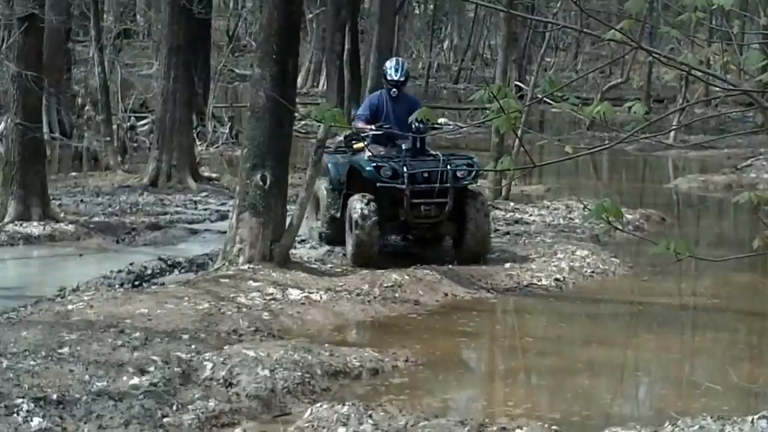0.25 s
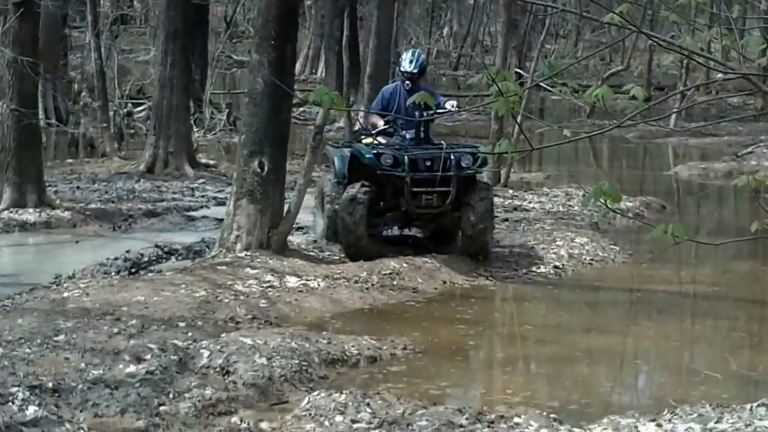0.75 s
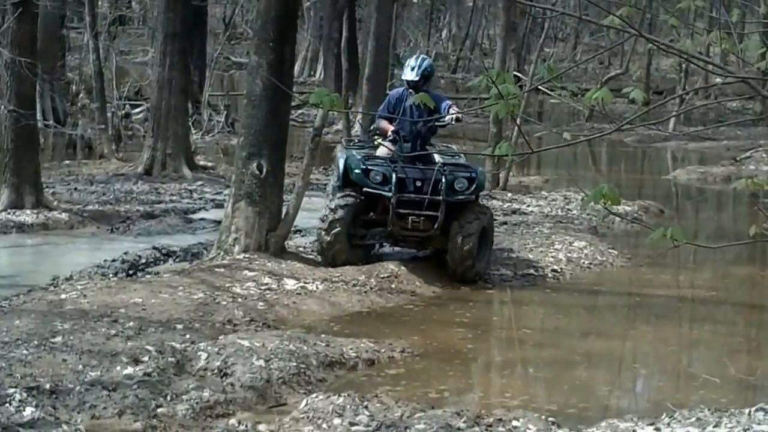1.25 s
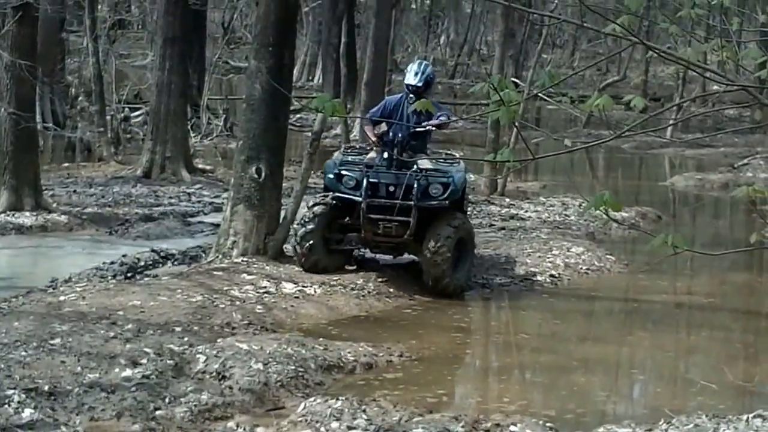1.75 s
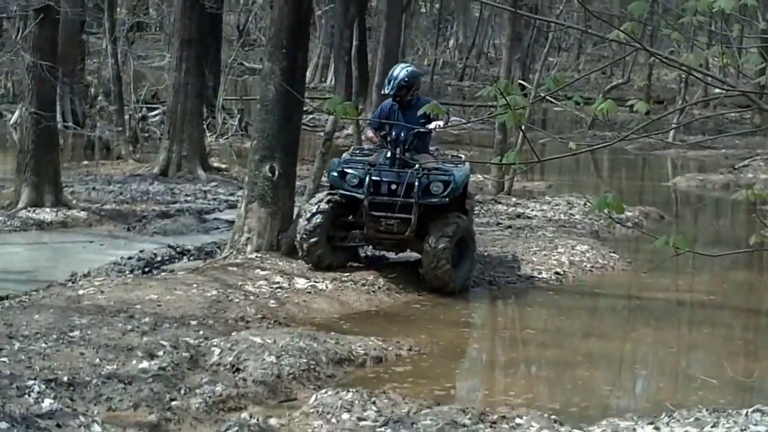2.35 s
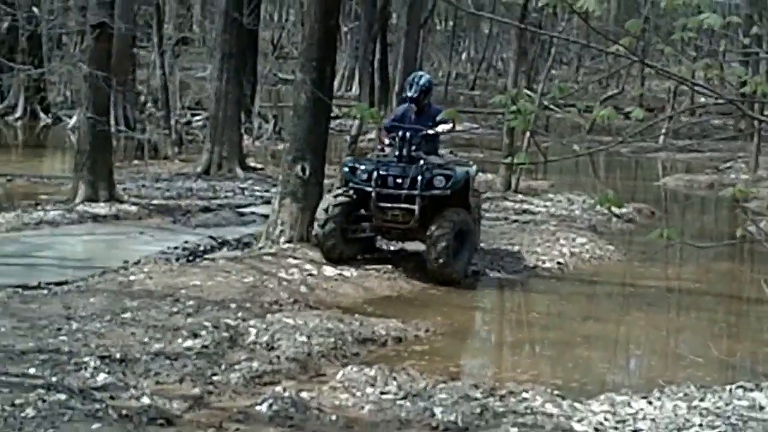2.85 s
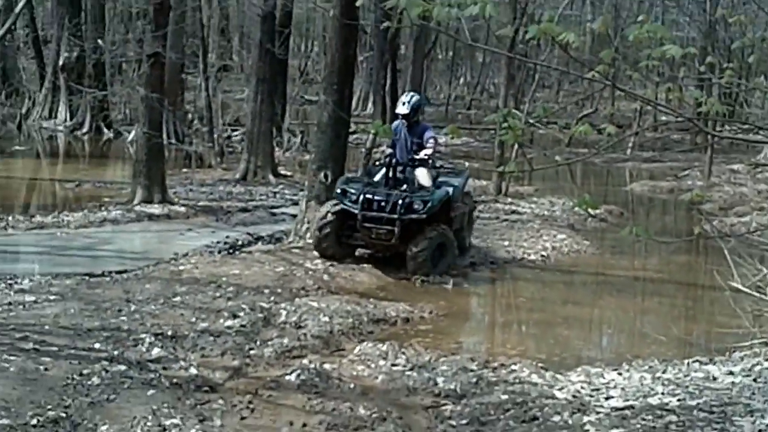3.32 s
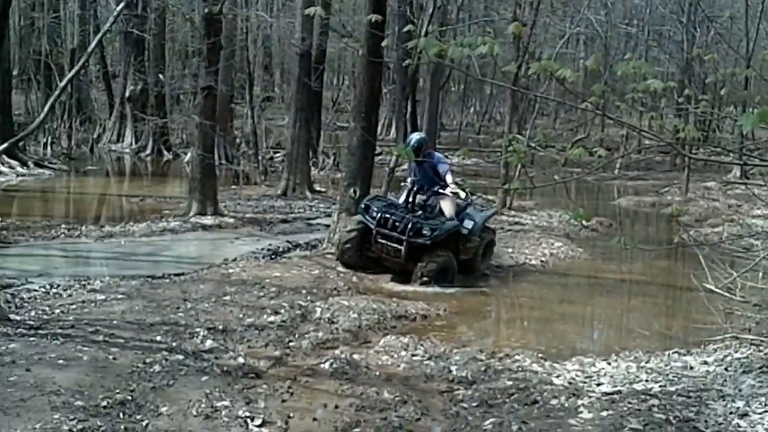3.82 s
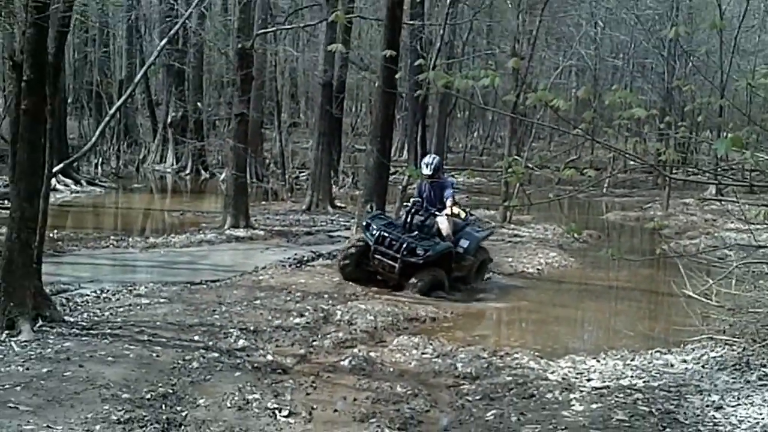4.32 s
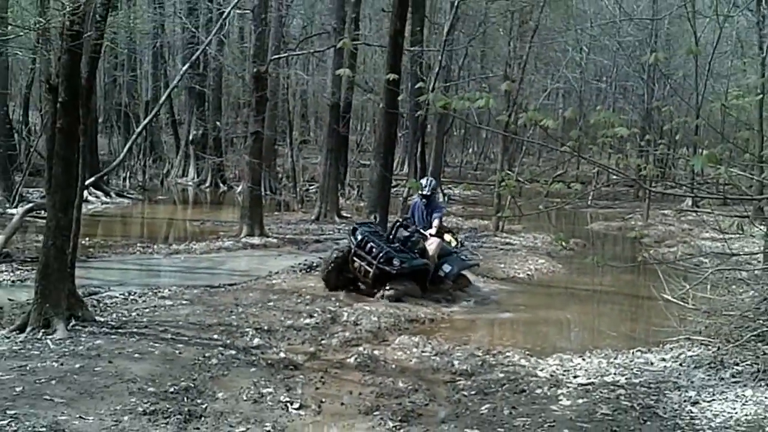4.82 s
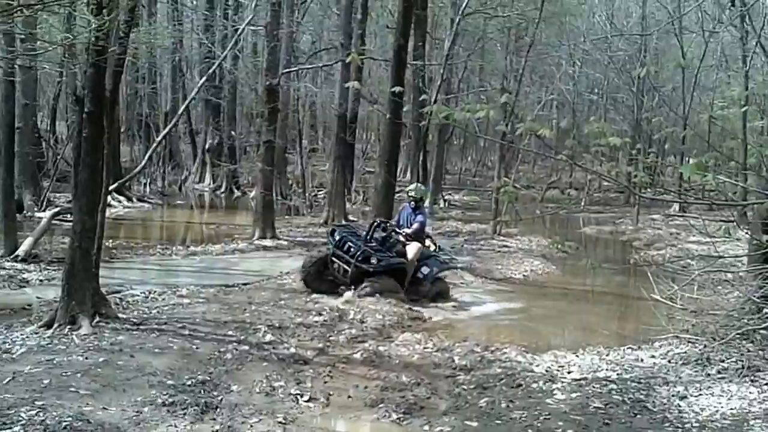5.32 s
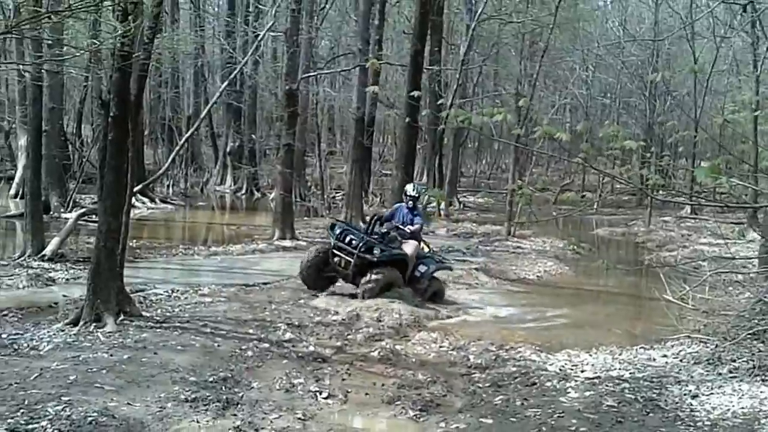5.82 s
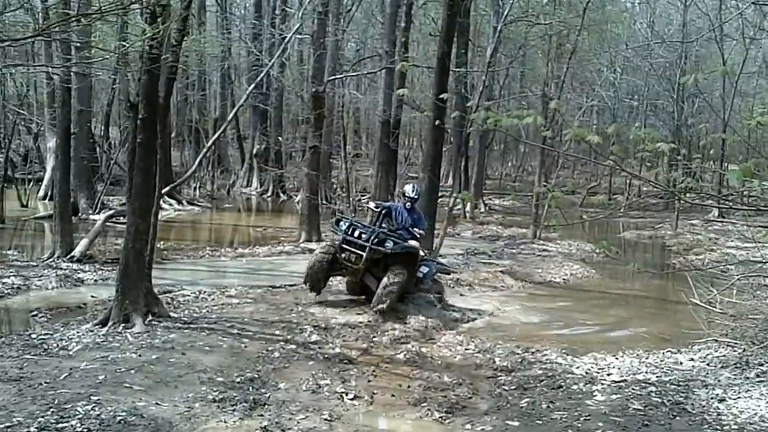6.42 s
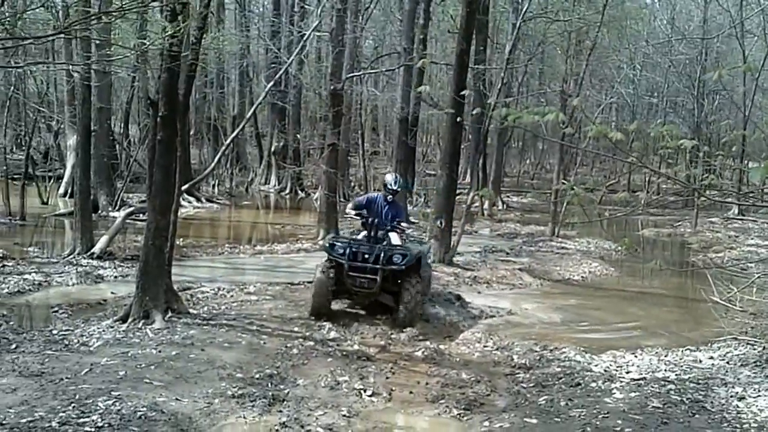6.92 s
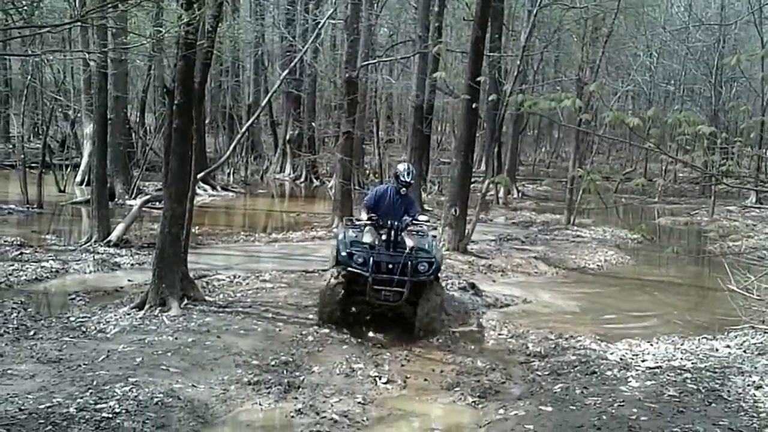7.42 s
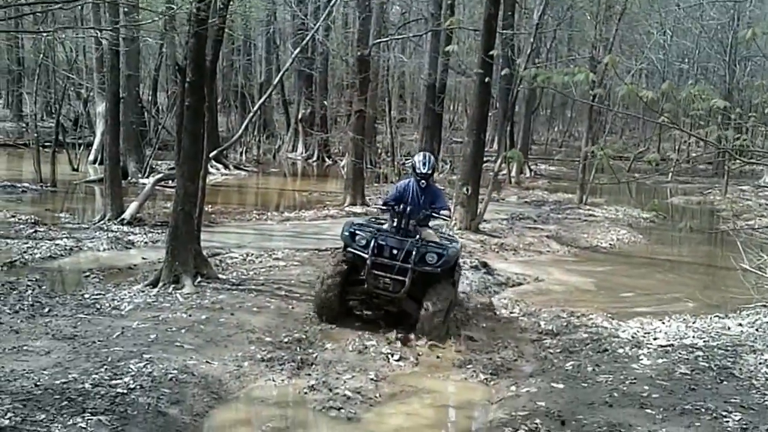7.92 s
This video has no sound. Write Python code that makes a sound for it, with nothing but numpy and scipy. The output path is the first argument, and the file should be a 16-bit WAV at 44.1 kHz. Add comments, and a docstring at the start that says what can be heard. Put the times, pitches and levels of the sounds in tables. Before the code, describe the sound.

Low, throbbing four-stroke ATV engine bogs down and revs again in mud, with metallic ticking, wet spits and clods knocking on panels.

```python
"""A single-cylinder four-stroke quad bike labours through mud and a pool in a swampy wood.
It slows raggedly after 1 s, surges at 2 s, sags again near 3.5 s, then pulls hard amid growing clatter.
Each stroke clicks damped resonances of pipes and frame over a harmonic drone and shaped gas noise.
Random grains make clatter and mud fizz, noise bursts make spits and clods, and sparse echoes make
the wood; the whole sound has four notches, a treble step and a band limit."""
import sys
import numpy as np
from scipy import signal
from scipy.fft import rfft, irfft
from scipy.io import wavfile
from scipy.ndimage import uniform_filter1d, map_coordinates

SR = 44100
rng = np.random.default_rng(int(sys.argv[2]) if len(sys.argv) > 2 else 0)


def bounce(signal):
    """Save signal as a 16-bit WAV file at the path given by the first command-line argument."""
    frames = np.transpose(np.atleast_2d(signal))
    limited = np.clip(frames, -1, 1)
    pcm = np.round(limited * 32767).astype(np.int16)
    wavfile.write(sys.argv[1], SR, pcm)


N = 359856

# Firing rate. Each row: time in seconds, firings per second.
FIRING_RATE = [(0.0, 20.23), (0.12, 21.93), (1.24, 17.08), (1.44, 13.91), (1.82, 15.18), (2.16, 24.52),
               (2.36, 22.98), (2.62, 24.27), (2.86, 23.62), (3.04, 19.23), (3.26, 17.47), (3.54, 12.9),
               (3.76, 21.07), (3.96, 22.06), (4.36, 21.04), (4.88, 22.15), (5.3, 20.72), (5.74, 24.63),
               (5.98, 23.35), (6.28, 23.31), (6.58, 22.46), (7.04, 24.22), (7.22, 21.59), (8.16, 25.51)]
# Ragged burning off the throttle. Each row: time in seconds, share of gas noise in the power from 0 to 1.
RAGGEDNESS = [(0, .2), (.55, .25), (1, .45), (1.9, .5), (2.2, .13), (2.9, .12), (3.1, .5), (3.5, .45),
              (3.8, .14), (7, .15), (8.16, .2)]
# Engine balance. Each row: time in seconds, exhaust thump in dB, intake ring in dB, valve ring in dB
# above the intake ring, drone in dB within the thump, throat in dB within the ring.
ENGINE_LEVELS = [(0.0, -31.5, -40.5, -20, 6, -2.5), (0.4, -29.5, -43, -19, -2, -1.5),
                 (0.98, -32.5, -46.5, -5, -7, -8), (1.05, -37.5, -53, -2, 3, -3),
                 (1.4, -36.5, -51, -4.5, 6.5, -15), (1.8, -32.5, -47.5, -12, -3.5, -4),
                 (1.94, -35.5, -46.5, -16, 6, -2.5), (2.05, -24.5, -33.5, -10, -6, -2.5),
                 (2.2, -32, -39, -0.5, 3.5, -3), (2.68, -26.5, -37, -3, -6, -2.5),
                 (2.9, -28.5, -38, -3, -1.5, -3), (3.04, -29.5, -47, -28, -6, -1),
                 (3.3, -32, -54, -16, -3, 4), (3.5, -35, -54, -10, -4, 0.5),
                 (3.6, -30.5, -38.5, -20, -3, -5), (3.72, -24, -42.5, -10, -13, 6),
                 (3.95, -25, -35.5, -22, -2, -7.5), (4.42, -25, -40.5, -12, 2.5, -3),
                 (4.6, -25.5, -37.5, -9, -2.5, -3.5), (5.25, -25, -35.5, -21, -2.5, -5),
                 (5.4, -23.5, -39.5, -5, -2, 0.5), (6.1, -24, -37, -3.5, -4, -2.5),
                 (6.93, -22, -32.5, -16, -9, -7.5), (7.27, -32.5, -42.5, -5, 10, 8.5),
                 (7.4, -22.5, -40, 0, -4, 6), (8.16, -29.5, -39.5, -1, 0, 7.5)]
# Single hard firings as the throttle snaps, and the loud valve closing that follows the one at 3.541 s. Each
# row: time in seconds, thump lift in dB, ring lift in dB.
HARD_FIRINGS = [(2.02, 4, -8), (3.376, 8.5, 6), (3.541, 9.5, 9), (3.565, 0, 10), (3.68, 0, 2)]
# Resonances of the intake airbox. Each row: frequency in Hz, bandwidth in Hz, level in dB.
AIRBOX_MODES = [(176, 80, 0), (225, 90, -12)]
# Resonances of the muffler. Each row: frequency in Hz, bandwidth in Hz, level in dB.
MUFFLER_MODES = [(100.8, 13.6, -4), (151, 10.2, -13)]
# Resonance of the frame, driven opposite to the muffler. Each row: frequency in Hz, bandwidth in Hz, level in dB.
FRAME_MODES = [(76, 27, -15)]
# Fixed resonances of the intake tract. Each row: frequency in Hz, bandwidth in Hz, level in dB.
TRACT_MODES = [(418, 28, -7), (530, 70, -6), (620, 50, -11), (1110, 120, -13)]
# Resonances rung by the closing valve alone. Each row: frequency in Hz, bandwidth in Hz, level in dB.
VALVE_MODES = [(697, 45, 0), (413, 24, -6.5)]
# Drifting resonance of the throat. Each row: time in seconds, frequency in Hz.
THROAT_PITCH = [(0, 275.6), (2, 281.6), (3, 285), (4.3, 280.3), (6.4, 278.2), (7.2, 294), (8.16, 308)]
# Relative levels of the drone's partials, in order of rising frequency, in dB.
DRONE_LEVELS = (-11, -13.5, 1, -5.5)
# Turbulent exhaust gas. Each row: frequency in Hz, relative spectral density in dB per Hz.
GAS_SPECTRUM = [(12, -41), (20, -34), (48, -10), (87, -10.5), (108, -11.5), (129, -8.5), (195, -15.5),
                (281, -14), (352, -80), (419, -8), (665, -10), (831, -18.5), (900, -32.5), (1170, -45),
                (1980, -120)]
# Clatter level. Each row: time in seconds, level in dB.
CLATTER_LEVELS = [(0.0, -41.5), (0.55, -39.5), (1.04, -44), (1.92, -50.5), (2.03, -35.5), (2.29, -42.5),
                  (2.68, -36.5), (2.98, -41.5), (3.5, -44.5), (3.73, -37.5), (4.04, -42), (4.41, -38.5),
                  (6.14, -37.5), (6.6, -34.5), (6.91, -31.5), (7.2, -33.5), (7.45, -31), (7.57, -33),
                  (8.16, -28)]
# Casing and body panels. Each row: frequency in Hz, relative spectral density in dB per Hz.
PANEL_SPECTRUM = [(500, 4), (800, -7), (1110, 5), (1380, -4), (1670, 2.5), (2200, -1), (3300, -2.5),
                  (4100, -5.5), (4950, -15), (6500, -27), (9000, -42)]
# Fizz of churned mud. Each row: frequency in Hz, relative spectral density in dB per Hz.
MUD_SPECTRUM = [(3000, -5), (5000, 2.5), (6300, 2), (8000, -7), (10000, -10.5), (12500, -13), (15300, -24)]
# Loudest stones and clods on the body panels. Each row: time in seconds, level in dB before the band filter.
PANEL_HITS = [(0.1306, -29), (0.5237, -24.5), (0.6923, -26), (0.7168, -30), (0.9348, -33), (3.2854, -33),
              (3.3209, -30.5), (3.7324, -26.5), (3.8072, -28), (4.2542, -29), (6.6558, -25), (6.7281, -36),
              (6.8209, -20), (7.2639, -28), (7.3956, -16.5), (7.4445, -19.5)]
# Clearest spits of mud and water. Each row: time in seconds, level in dB of the lower hiss at its start,
# upper hiss in dB relative to the lower.
CLEAR_SPITS = [(0.176, -37, -24), (0.3614, -34, -28), (1.0141, -35, -23), (1.1687, -42, -14),
               (1.2386, -45, -12), (1.696, -46, -9), (1.949, -43, -23), (2.623, -34, -25),
               (2.6993, -45, -18), (3.111, -37, -9), (3.153, -32.5, -12), (3.2196, -38, -9),
               (3.2779, -35, -14), (3.3755, -38, -14), (3.488, -37.5, -28), (3.6217, -39, -10),
               (3.7324, -28.5, -26), (3.81, -35, -19), (4.1694, -32, -27), (4.4662, -28, -31),
               (6.263, -32, -21), (6.5799, -33, -21), (6.77, -37, -30), (7.1404, -31, -21),
               (7.401, -29, -8), (7.6784, -39, -2), (7.7136, -33, -3)]
# Notches in the sound's spectrum. Each row: centre frequency in Hz, bandwidth in Hz.
SPECTRAL_NULLS = [(2702, 490), (5507, 380), (7865, 1070), (10928, 850)]

# moments of the intake gulp, its echo, intake closing and exhaust blow, as shares of the cycle
GULP_AT, ECHO_AT, SHUT_AT, BLOW_AT = .258, .397, .54, .647
GULP_DB, SHUT_DB = -1.5, -13.5  # gulp in the thump, valve closing relative to the gulp
DRONE_ORDERS, DRONE_CREST = (1, 3, 5, 7), .79  # multiples of the firing rate, crest as share of the cycle
THROAT_WIDTH_HZ, THROAT_RISE_S = 10.3, .0038
KICK_S = .022  # half length of a hard firing
FIZZ_DB, FIZZ_SLOPE, FIZZ_PIVOT_DB = -6.5, .12, -37  # fizz re clatter at the pivot, dB per dB of clatter, pivot
CLOD_T60_S, SPIT_T60_S = .06, .025
SMALL_SPITS, SMALL_SPIT_DB = 20, -1  # count, mean level above the clatter
SMALL_SPREAD_DB, SMALL_TOP_DB = 4.5, -21  # spread of level, upper hiss relative to lower
SHELF_HZ, SHELF_DB, EDGE_HZ = 4970, -4.5, 15290  # treble step, its depth, band limit


def exhaust(cycles, rate_hz, uneven):
    """Impulsive excitation: strokes ring their pipes over a periodic drone, while turbulence adds noise."""
    thump_db, ring_db, valve_db, drone_db, throat_db = curves(ENGINE_LEVELS)
    thump_up_db, ring_up_db = kicks()
    gulp, echo, shut, blow = (strokes(cycles, at, uneven) for at in (GULP_AT, ECHO_AT, SHUT_AT, BLOW_AT))

    intake = rung(gain_of(GULP_DB) * (gain_of(-5.5) * echo - gulp), AIRBOX_MODES, .0015)
    outlet = rung(gain_of(-9) * gulp - blow, MUFFLER_MODES, .005)
    outlet += rung(blow, FRAME_MODES, .004)

    tract = throat(gain_of(throat_db) * gulp)
    tract -= rung(gulp + gain_of(SHUT_DB) * shut, TRACT_MODES, .0012)
    valve = evened(rung(shut, VALVE_MODES, .001))
    ring = evened(band(tract, 200, 3000)) - gain_of(valve_db) * valve

    gas_swell = 2.9 + puff(cycles, GULP_AT, .92)
    gas = coloured(rng.standard_normal(N) * gas_swell, GAS_SPECTRUM)
    drone = gain_of(drone_db + 3 * uneven * wander(12)) * drone_partials(cycles)

    # slow running rings less often but as loudly
    clean = np.sqrt((1 - uneven) / rate_hz * rate_hz.mean())
    rough = np.sqrt(uneven)
    low = clean * evened(evened(intake + outlet) + drone) + rough * evened(band(gas, 3.7, 207))
    high = clean * ring + rough * evened(band(gas, 240, 1000))
    return gain_of(thump_db + thump_up_db) * low + gain_of(ring_db + ring_up_db) * high


def strokes(cycles, at, uneven):
    """Cyclic irregularity: one click a cycle, its timing and size scattered more as burning grows ragged."""
    turns = np.floor(cycles - at).astype(int)
    where = np.flatnonzero(np.diff(turns)) + 1
    size, late = rng.standard_normal((2, 300))[:, :len(where)]
    shift = (25 * uneven[where] * late).astype(int)  # samples
    moved = np.clip(where + shift, 0, N - 1)
    train = np.zeros(N)
    train[moved] = gain_of(7 * uneven[where] * size)
    return train


def rung(train, modes, rise_s):
    """Modal impulse response: every click starts damped sines, softened by a push of finite length."""
    t = np.arange(SR // 4) / SR
    ring = sum(gain_of(db) * np.exp(-np.pi * width * t) * np.sin(2 * np.pi * hz * t)
               for hz, width, db in modes)
    push = signal.windows.hann(round(rise_s * SR))
    response = np.convolve(ring, push / push.sum())
    return signal.oaconvolve(train, response)[len(push) // 2:][:N]


def throat(train):
    """Time-varying resonance: clicks start a damped sine whose frequency drifts slowly."""
    turn = np.exp(2j * np.pi * np.cumsum(curves(THROAT_PITCH)[0]) / SR)
    decay = np.exp(-np.pi * THROAT_WIDTH_HZ / SR)  # per sample
    ring = (turn * signal.lfilter([1], [1, -decay], train / turn)).imag
    push = signal.windows.hann(round(THROAT_RISE_S * SR))
    return signal.oaconvolve(ring, push / push.sum(), "same")


def drone_partials(cycles):
    """Fourier synthesis: odd multiples of the firing rate, all cresting at one point of the cycle."""
    phase = 2 * np.pi * (cycles - DRONE_CREST)
    return sum(gain_of(db) * np.cos(k * phase) for k, db in zip(DRONE_ORDERS, DRONE_LEVELS))


def kicks():
    """Transient loading: hard firings, and one loud valve closing, lift the thump and the ring, in dB, by short
    triangles."""
    t = np.arange(N) / SR
    return sum(np.outer(up_db, np.maximum(1 - abs(t - s) / KICK_S, 0)) for s, *up_db in HARD_FIRINGS)


def puff(cycles, at, length):
    """Periodic relaxation: an envelope jumps once a cycle at 'at' and decays over the share 'length'."""
    return uniform_filter1d(np.exp(-((cycles - at) % 1) / length), 60)


def clatter_and_fizz(cycles):
    """Modulated shot noise: valves tick twice a cycle over belt whirr; churned mud fizzes in small grains."""
    clatter_db, = curves(CLATTER_LEVELS)
    fizz_db = FIZZ_DB + FIZZ_SLOPE * (clatter_db - FIZZ_PIVOT_DB)
    ticks = puff(cycles, SHUT_AT, .13) + .5 * puff(cycles, GULP_AT, .17)
    beat = (1.86 + ticks) * gain_of(.5 * wander(12))
    clatter = coloured(grains(2.06, 6000) * beat, PANEL_SPECTRUM)
    fizz = coloured(grains(1.9, 7000) * beat * gain_of(.71 * wander(30)), MUD_SPECTRUM)
    return gain_of(clatter_db) * (clatter + gain_of(fizz_db) * fizz)


def grains(spread_db, per_s):
    """Shot noise: random clicks of either sign, most small and a few large."""
    size = gain_of(spread_db * np.minimum(rng.exponential(1, N), 5))
    return size * (rng.random(N) < per_s / SR) * rng.choice([-1, 1], N)


def clods():
    """Impact noise: each stone or clod is a short, decaying, band-limited rattle of the panels."""
    out, t = np.zeros(N + 4000), np.arange(4000) / SR
    for s, db in PANEL_HITS:
        rattle = band(rng.standard_normal(4000), 1870, 4760)
        envelope = gain_of(db - 60 * t / CLOD_T60_S) * np.minimum(t / .00023, 1)
        out[round(s * SR):][:4000] += envelope * rattle
    return out[:N]


def spits():
    """Splash noise: decaying two-band hiss; smaller spits fall at random and follow the clatter level."""
    out, t = np.zeros(N + 4000), np.arange(4000) / SR
    when = rng.random(SMALL_SPITS) * N / SR
    size = rng.standard_normal(SMALL_SPITS)
    level_db = np.interp(when, *np.transpose(CLATTER_LEVELS)) + SMALL_SPIT_DB + SMALL_SPREAD_DB * size
    small = [(s, db, SMALL_TOP_DB) for s, db in zip(when, level_db)]
    for s, db, top_db in list(CLEAR_SPITS) + small:
        noise = rng.standard_normal(4000)
        hiss = evened(band(noise, 2970, 7600)) + gain_of(top_db) * evened(band(noise, 10400, 16000))
        envelope = gain_of(db - 60 * t / SPIT_T60_S) * np.minimum(t / .00091, 1)
        out[round(s * SR):][:4000] += envelope * hiss
    return out[:N]


def wood(x):
    """Multiple scattering: sparse echoes off the trunks, of random sign, fall 60 dB in half a second."""
    taps = np.zeros(SR // 2)
    at = np.arange(500, len(taps) - 20, 20)  # one echo in every 20 samples
    signs = rng.choice([-1., 1.], len(at))
    taps[at + rng.integers(0, 20, len(at))] = signs * gain_of(-60 * at / SR / .5)
    return signal.fftconvolve(x, taps / np.linalg.norm(taps))[:N]


def gain_of(db):
    """Decibel law: amplitude ratio of a level in dB."""
    return 10 ** (np.asarray(db) / 20)


def evened(x):
    """Normalisation: scales x to rms 1."""
    return x / np.sqrt(np.mean(x ** 2) + 1e-20)


def curves(rows):
    """Linear interpolation: each column after the time becomes a curve over the samples."""
    s, *columns = np.transpose(rows)
    return [np.interp(np.arange(N) / SR, s, c) for c in columns]


def coloured(x, points):
    """Spectral shaping: filters x by the drawn curve, straight in log frequency, to rms 1."""
    f, db = np.transpose(points)
    hz = np.fft.rfftfreq(N, 1 / SR)
    shape_db = np.interp(np.log(hz + 1), np.log(f + 1), db)
    return evened(irfft(rfft(x) * gain_of(shape_db), N))


def band(x, lo_hz, hi_hz):
    """Band limitation: a third-order Butterworth bandpass."""
    return signal.sosfilt(signal.butter(3, [lo_hz, hi_hz], "bandpass", fs=SR, output="sos"), x)


def wander(per_s):
    """Slow random fluctuation: a smooth curve through per_s normal values each second."""
    knots = rng.standard_normal(400)
    return map_coordinates(knots, [np.arange(N) / SR * per_s], order=3)


def scene():
    """Superposition: the sources on the machine add, and the wood returns their sum more faintly."""
    (rate_hz,), (uneven,) = curves(FIRING_RATE), curves(RAGGEDNESS)
    cycles = .64 + np.cumsum(rate_hz) / SR
    near = exhaust(cycles, rate_hz, uneven) + clatter_and_fizz(cycles) + spits() + clods()
    return (near + gain_of(-10) * wood(near))[None]


def record(dry):
    """Linear filtering: a filter cuts four narrow bands, lowers the treble and thins deep bass; then a band limit."""
    hz = np.fft.rfftfreq(N, 1 / SR)
    shelf = 1 / (1 + np.exp(np.clip((SHELF_HZ - hz) / 12, -50, 50)))
    colour = hz / (hz + 6) * gain_of(SHELF_DB * shelf).astype(complex)
    for null_hz, width in SPECTRAL_NULLS:
        off = 1j * (hz - null_hz) / width
        colour *= (off + .01) / (off + 1)
    heard = irfft(rfft(dry) * colour, N)
    limit = signal.firwin(2047, EDGE_HZ, window=("kaiser", 10), fs=SR)
    return signal.oaconvolve(heard, limit[None], "same")


dry = scene()
out = record(dry)
bounce(out)
```